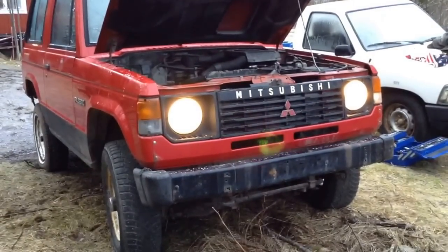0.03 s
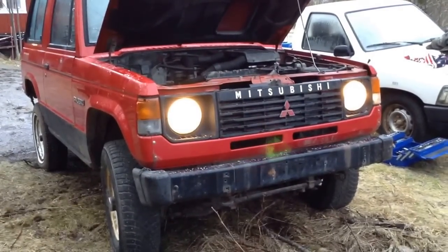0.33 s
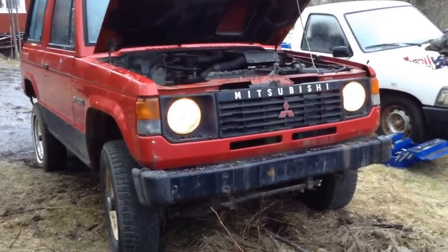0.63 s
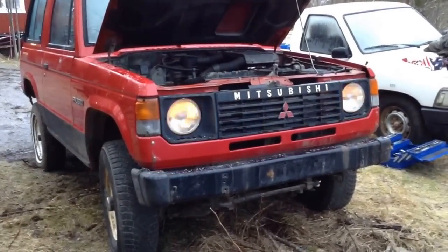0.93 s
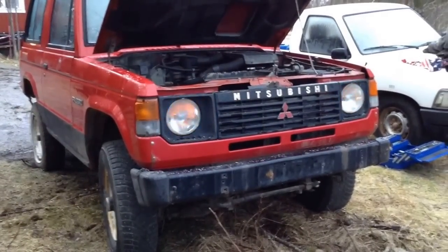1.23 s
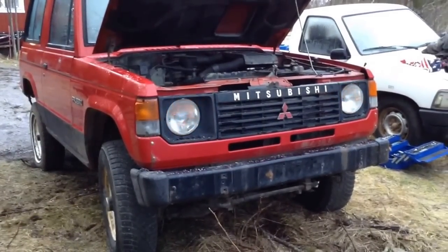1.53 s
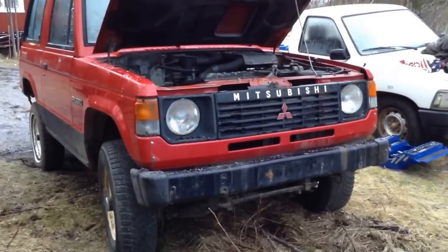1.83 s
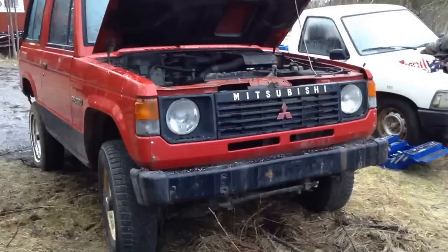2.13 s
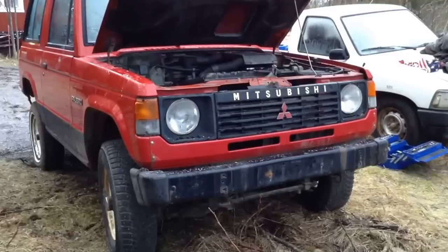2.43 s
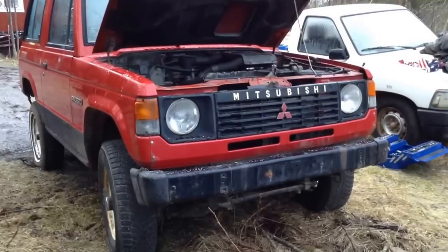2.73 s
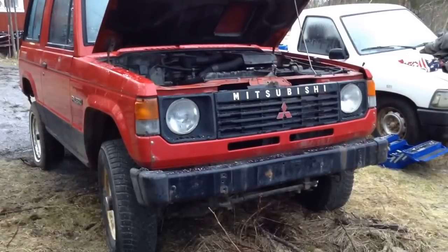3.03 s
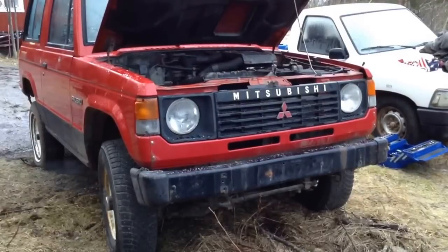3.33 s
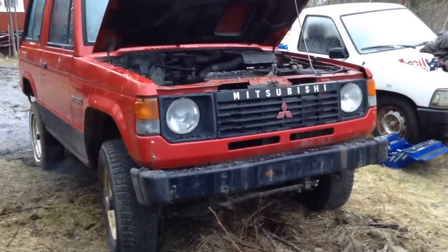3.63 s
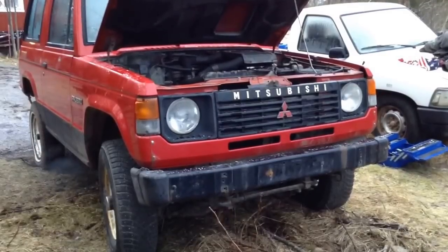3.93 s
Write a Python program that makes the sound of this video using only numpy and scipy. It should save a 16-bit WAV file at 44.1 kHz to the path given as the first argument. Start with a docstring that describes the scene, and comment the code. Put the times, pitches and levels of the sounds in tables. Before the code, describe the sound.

A parked off-road vehicle's diesel engine struggles to start, heard outdoors near the open bonnet. Relay clicks and a metallic clack lead to brief grinding cranking, then rough, stumbling running with rattles and repeated short rasps from the starter.

```python
"""A cold diesel is started outdoors, bonnet open, a few metres away.
First a relay clicks; the starter pinion slams in, rebounds and rings in its free modes. The gear teeth
then whine and grind through two compression strokes, their meshing rate falling at each. At last the
engine fires unevenly, each impulse exciting the resonances of block and exhaust; whenever it stumbles,
the still spinning pinion catches the ring gear with a harsh rasp, and twice the starter drive squeaks."""
import sys
import numpy as np
from scipy import signal
from scipy.fft import rfft, irfft
from scipy.io import wavfile
from scipy.ndimage import uniform_filter1d

SR = 44100
rng = np.random.default_rng(int(sys.argv[2]) if len(sys.argv) > 2 else 0)


def store_pcm(level_fs):
    """Save levels as 16-bit WAV."""
    pcm = np.round(np.clip(level_fs, -1, 1) * 32767).astype(np.int16)
    wavfile.write(sys.argv[1], SR, np.atleast_2d(pcm).T)


N = 176400
T = np.arange(N) / SR
SLAM_S, TOP_HZ = 0.587, 15450
FIRING_ENVELOPE_S = (0.009, 0.013, 0.022)  # attack, hold, decay

# cylinder firings (time [s], level [dB])
FIRINGS = [(1.335, -30), (1.56, -26.5), (1.63, -20), (1.805, -32), (2.015, -27), (2.087, -23.5),
           (2.156, -26), (2.227, -26.5), (2.363, -26), (2.428, -33.5), (2.508, -15), (2.592, -28),
           (2.664, -25.5), (2.734, -28), (2.785, -25), (2.931, -26.5), (2.991, -24), (3.05, -29),
           (3.185, -26.5), (3.279, -15), (3.439, -24), (3.5, -33.5), (3.681, -30), (3.756, -23.5),
           (3.812, -32.5)]
# pinion catches (time [s], hold [s], level [dB], initial tooth rate [Hz], relative whine [dB])
RASPS = [(1.324, 0.021, -18.5, 1235, 2), (1.355, 0.016, -26.5, 897, 7.5), (1.467, 0.0059, -16, 1299, 5.5),
         (1.522, 0.0039, -21, 1468, -12), (1.622, 0.0038, -20.5, 1470, 3), (1.709, 0.008, -12.5, 1716, 3),
         (1.884, 0.008, -14.5, 1664, 8), (1.902, 0.028, -18.5, 1355, 4), (2.08, 0.0032, -20, 1490, -14),
         (2.293, 0.0058, -11, 1682, 5.5), (2.503, 0.0057, -12, 1315, 3), (2.52, 0.0044, -11.5, 1280, -3),
         (2.861, 0.0097, -12.5, 1247, -3.5), (3.121, 0.011, -15, 1251, -4),
         (3.259, 0.0046, -13.5, 1322, 2.5), (3.277, 0.018, -11.5, 1355, -4),
         (3.372, 0.0068, -9.5, 1643, -9), (3.582, 0.02, -12.5, 1604, -2), (3.898, 0.0074, -11, 1636, 6),
         (3.913, 0.013, -18.5, 1326, -1.5)]
# resonances of the bell housing and block (frequency [Hz], lift [dB])
HOUSING = [(500, 7.5), (830, 3), (1105, 1), (1660, 0), (2800, 1.5), (3150, 4.5), (3720, 1), (4835, 9.5)]
# spectral envelope of the gear whine (frequency [Hz], gain [dB])
WHINE_COLOUR = [(300, -21), (480, 2), (600, -15), (800, 0), (1130, 4), (1450, -9), (1700, -2.5), (2900, -6),
                (5000, -20), (9000, -16.5)]


def amp(db):
    """Amplitude ratio of a level in decibels."""
    return 10 ** (np.asarray(db) / 20)


def unit(x):
    """Normalisation to rms 1."""
    return x / np.sqrt(np.mean(x ** 2))


def curve(rows, column=1):
    """Linear interpolation of a column in time."""
    rows = np.array(rows)
    return np.interp(T, rows[:, 0], rows[:, column])


def colour_at(hz, colour):
    """Gain [dB] of a spectral envelope, interpolated in log frequency."""
    colour = np.array(colour)
    return np.interp(np.log(hz + 1), np.log(colour[:, 0]), colour[:, 1])


def shape(x, colour, peaks=(), width_hz=118):
    """Source-filter model: a broad envelope and narrow resonances colour x; rms 1."""
    hz = np.arange(N // 2 + 1) * SR / N
    resonance_db = sum(lift / (1 + (2 * (hz - centre) / width_hz) ** 2) for centre, lift in peaks)
    return unit(irfft(rfft(x) * amp(colour_at(hz, colour) + resonance_db), N))


def walk(rate_hz, size=N):
    """Low-pass random fluctuation; rms 1."""
    span = max(int(SR / rate_hz), 2)
    return unit(uniform_filter1d(uniform_filter1d(rng.standard_normal(size), span), span))


def rough_noise(spread_db, rate_hz):
    """Randomly modulated noise: dense small impacts of uneven strength."""
    return rng.standard_normal(N) * amp(spread_db * walk(rate_hz))


def burst(start, attack, hold, decay):
    """Linear attack, hold and exponential decay, all in seconds."""
    age = T - start
    return np.clip(age / attack, 0, 1) * np.exp(-np.maximum(age - attack - hold, 0) / decay)


def engine():
    """Impulsive excitation: firings clatter and boom over a whirr that sags before each stumble."""
    # firing spectrum (frequency [Hz], gain [dB])
    clatter_colour = [(120, -59), (300, -2.5), (500, 0), (3000, -1), (4200, -9), (15000, -12)]
    # whirr of the starter and valve gear (time [s], level [dB])
    whirr_levels = [(1.2, -35.5), (1.28, -36), (1.6, -29), (1.95, -33), (2.12, -30), (3.35, -28.5),
                    (3.6, -32), (3.8, -29)]
    # its spectrum (frequency [Hz], gain [dB])
    whirr_colour = [(50, -30), (190, 0.5), (400, -3.5), (850, -2.5), (3230, -5.5), (4190, -9), (4700, -5.5),
                    (8000, -9), (10300, -9), (15500, -20.5)]
    stall_db, lead_s = -2, 0.02  # the engine slows just before the pinion catches
    knocks = sum(amp(db) * burst(start, *FIRING_ENVELOPE_S) for start, db in FIRINGS)
    running = amp(curve(whirr_levels)) * (T > whirr_levels[0][0])
    clatter = knocks * shape(rough_noise(1.85, 250), clatter_colour, HOUSING)
    whirr = running * shape(rough_noise(0.76, 280), whirr_colour)
    loose = amp(-9) * np.hypot(running, knocks / 2) * rattles()
    stall = np.max([np.exp(-((T - start) / lead_s + 1) ** 2) for start, *_ in RASPS], axis=0)
    return clatter + boom() + (whirr + loose) * amp(stall_db * stall)


def boom():
    """Modal response: each firing rings the block and exhaust; hard firings boom most."""
    # low modes (frequency [Hz], relative level [dB])
    modes = [(122, -13.5), (172, -5.5), (217, -1), (287, 0), (495, -2), (700, -4.5)]
    growth, detune = 0.12, 0.04  # extra dB per dB of firing strength; relative pitch spread
    out, mean_db = np.zeros(N), np.mean([db for _, db in FIRINGS])
    hz, mode_db = np.array(modes).T
    for start, db in FIRINGS:
        part = slice(int(start * SR), int(start * SR) + SR // 5)
        pitch = hz * (1 + detune * rng.standard_normal(len(hz)))
        cycles = np.outer(T[part], pitch) + rng.random(len(hz))
        ring = np.sin(2 * np.pi * cycles) @ amp(mode_db)
        force = amp(db + growth * (db - mean_db)) * burst(start, *FIRING_ENVELOPE_S)
        out[part] += force[part] * ring
    return amp(-8.5) * out


def cranking():
    """Gear meshing: the starter whines and grinds at the tooth rate, slowing at each compression."""
    # starter speed (time [s], tooth rate [Hz])
    mesh = [(.6, 402), (.66, 543.5), (.724, 571), (.764, 531.4), (.797, 440.2), (.83, 331), (.89, 390.6),
            (.935, 734.3), (.965, 851.6), (1.0, 894), (1.05, 816.3), (1.085, 691), (1.11, 555.3),
            (1.14, 380.6), (1.19, 369.8), (1.235, 509.6)]
    # gear noise under load (time [s], whine level [dB], grind level [dB])
    load = [(.605, -32, -28), (.635, -35, -26.5), (.675, -23.5, -26.5), (.75, -23.5, -35.5),
            (.805, -25.5, -28), (.84, -36.5, -28.5), (.915, -29.5, -27.5), (.965, -20.5, -28),
            (1.105, -19.5, -27.5), (1.15, -35.5, -26), (1.215, -31, -26), (1.27, -56, -36)]
    # tooth friction spectra (frequency [Hz], gain [dB])
    grind_colour = [(50, -62), (276, -3), (591, -9.5), (1100, 5.5), (1560, -9.5), (1750, -2.5),
                    (4110, -11.5), (11100, -25.5), (15000, -47)]
    scrape_colour = [(1500, -41), (3000, -8), (4800, 5.5), (7000, -3), (10500, 3), (15000, -10)]
    hz = uniform_filter1d(curve(mesh), size=600) * (1 + 0.0128 * walk(510))
    cycles = np.cumsum(hz) / SR
    whine = gear_whine(cycles, hz, flutter_db=3.2, flutter_hz=230, harmonics=10)
    whine = 0.73 * whine + 0.22 * reflections(whine, decay_s=0.0044)
    grind = shape(rough_noise(1.6, 400) * tooth_friction(cycles, 0.6), grind_colour, HOUSING)
    scrape = shape(rough_noise(0.71, 400) * tooth_friction(cycles, 0.43), scrape_colour)
    sound = (whine + amp(-6.5) * scrape) * amp(curve(load)) + grind * amp(curve(load, column=2))
    return sound * burst(SLAM_S, 0.0054, 0.7, 0.026)


def rasps():
    """Sliding contact: the pinion catches the slowing ring gear and grinds with a falling whine."""
    grind, whine = np.zeros(N), np.zeros(N)
    slowing_per_s, jitter = 11, 1 + 0.065 * walk(1100)
    for start, hold, db, start_hz, whine_db in RASPS:
        part = slice(int(start * SR), int(start * SR) + 6000)
        hz = start_hz * np.exp(-slowing_per_s * (T[part] - start)) * jitter[part]
        cycles = np.cumsum(hz) / SR
        force = amp(db) * burst(start, 0.0062, hold, 0.0056)[part]
        grind[part] += force * tooth_friction(cycles, 0.8)
        tone = gear_whine(cycles, hz, flutter_db=4.5, flutter_hz=550, harmonics=6)
        whine[part] += force * amp(whine_db) * tone
    grind *= unit(rough_noise(1.0, 630))
    # grinding spectrum (frequency [Hz], gain [dB])
    rasp_colour = [(59, -53), (100, -33), (712, -6), (1040, -4), (2040, -5), (3120, -2), (4100, -6.5),
                   (4860, -8.5), (8230, -11.5), (10800, -6), (15500, -22)]
    return np.std(grind) * shape(grind, rasp_colour, HOUSING) + amp(-6) * whine


def gear_whine(cycles, hz, flutter_db, flutter_hz, harmonics):
    """Periodic tooth forces radiate harmonics, weighted by the body; each flutters on its own."""
    out = 0
    for k in range(1, harmonics + 1):
        db = colour_at(k * hz, WHINE_COLOUR) + flutter_db * walk(flutter_hz, len(hz))
        out += amp(db) * (k * hz < TOP_HZ) * np.sin(2 * np.pi * (k * cycles + rng.random()))
    return out


def tooth_friction(cycles, sharpness):
    """Amplitude modulation: friction peaks as each tooth lands."""
    return np.exp(sharpness * (np.cos(2 * np.pi * cycles) - abs(sharpness) / 2))


def clicks():
    """Impact noise: three relay clicks thunk in the bodywork, then the pinion clicks as it rebounds."""
    # three relay clicks and the pinion's rebound (time [s], level [dB], decay [s])
    impacts = [(0.44, -27.5, 0.0074), (0.533, -34, 0.02), (0.575, -28.5, 0.0099), (0.595, -20, 0.0091)]
    # their spectrum (frequency [Hz], gain [dB])
    click_colour = [(110, -44), (260, -3), (1090, -0.5), (2200, -10), (3100, -6), (4500, -14.5),
                    (9070, -14), (15000, -24)]
    thunk_hz = 237
    ticks = sum(amp(db) * burst(start, 0.0044, 0.0019, decay) for start, db, decay in impacts)
    thunks = sum(amp(db - 4.5) * burst(start, 0.0092, 0, 0.021)
                 for start, db, _ in impacts if start < SLAM_S)
    noise = shape(rng.standard_normal(N), click_colour)
    return ticks * noise + thunks * np.sin(2 * np.pi * thunk_hz * T)


def pinion_slam():
    """Damped free vibration: the pinion strikes its stop and rings."""
    # impact spectrum (frequency [Hz], gain [dB])
    slam_colour = [(100, -56), (300, -30), (764, -1), (9000, -2), (15000, -13)]
    # pinion modes (frequency [Hz], relative level [dB], 60 dB decay time [s])
    modes = [(1143, -17, .12), (7100, -4, 0.028), (9620, 3.5, 0.032), (13150, -2, .05)]
    slam = burst(SLAM_S, 0.0029, 0.0024, 0.0043) * shape(rng.standard_normal(N), slam_colour, HOUSING)
    jittered_time = np.cumsum(1 + 0.025 * walk(890)) / SR
    ring = 0
    for hz, db, t60 in modes:
        envelope = amp(db) * burst(SLAM_S, 0.0014, 0.002, t60 / np.log(1000))
        ring += envelope * np.sin(2 * np.pi * hz * jittered_time)
    return amp(-10.5) * slam + amp(-11.5) * ring


def squeaks():
    """Friction tones: the slipping starter drive squeaks roughly, its pitch rising and falling back."""
    # slips (time [s], hold [s], level [dB], centre pitch [Hz])
    slips = [(1.529, 0.0086, -22.5, 2740), (2.086, 0.021, -20.5, 2766)]
    arch_depth, arch_s = 0.044, 0.014
    out, jitter = 0, 1 + 0.0246 * walk(720)
    for start, hold, db, hz in slips:
        arch = 1 + arch_depth * np.sin(np.pi * (T - start) / arch_s)
        cycles = np.cumsum(hz * arch * jitter) / SR
        out += amp(db) * burst(start, 0.0019, hold, 0.0036) * np.sin(2 * np.pi * cycles)
    return out


def rattles(taps_per_s=70, decay_s=0.009, range_db=16.5):
    """Poisson impacts: tappets and loose parts each ring their own mix of housing modes."""
    taps, age = rng.random(N) < taps_per_s / SR, T[:SR // 10]
    strikes = taps * amp(range_db * rng.random((len(HOUSING), N)))
    rings = [np.exp(-age / decay_s) * np.sin(2 * np.pi * hz * age) for hz, _ in HOUSING]
    return unit(sum(signal.fftconvolve(strike, ring)[:N] for strike, ring in zip(strikes, rings)))


def reflections(x, decay_s):
    """Convolution with the dense, short echoes of engine bay and bonnet."""
    echo = rng.standard_normal(N) * burst(0.0039, 0.0022, 0, decay_s)
    return signal.fftconvolve(x, echo / np.sqrt(np.sum(echo ** 2)))[:N]


def hum():
    """Stationary noise: a faint, low background hum."""
    # background spectrum (frequency [Hz], gain [dB])
    hum_colour = [(40, -40), (95, -26), (155, -1), (245, 0.5), (450, -14), (15000, -27.5)]
    return amp(-70) * shape(rng.standard_normal(N), hum_colour)


def scene():
    """Superposition of direct sound, background and reflections."""
    direct = clicks() + pinion_slam() + cranking() + rasps() + squeaks() + engine()
    return (direct + hum() + amp(-13.5) * reflections(direct, decay_s=0.032))[None]


def record(dry):
    """Soft saturation rounds the peaks; band limiting thins the bass and cuts the top."""
    thin = signal.sosfilt(signal.butter(2, 70, "high", fs=SR, output="sos"), np.tanh(dry))
    return signal.sosfilt(signal.ellip(12, 0.2, 95, TOP_HZ, fs=SR, output="sos"), thin)


dry = scene()
out = record(dry)
store_pcm(out)
```